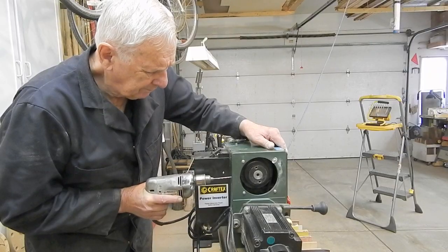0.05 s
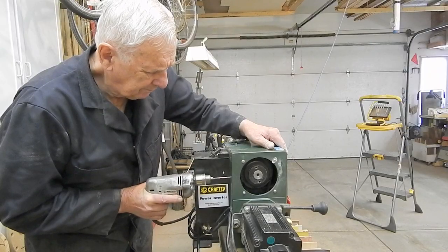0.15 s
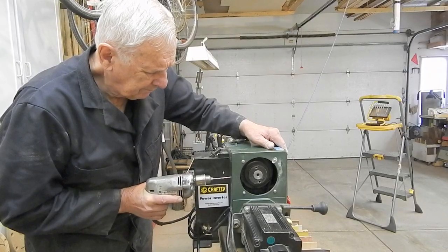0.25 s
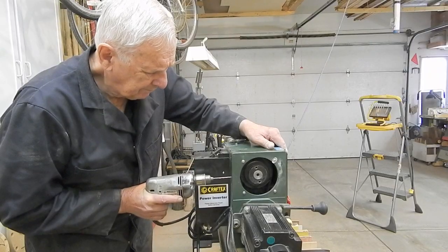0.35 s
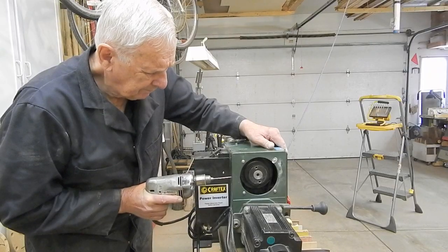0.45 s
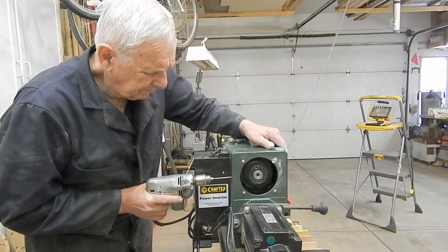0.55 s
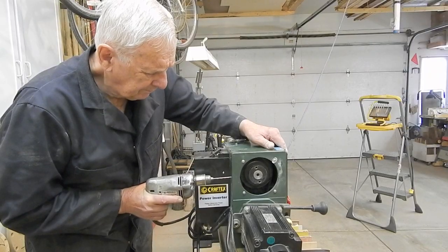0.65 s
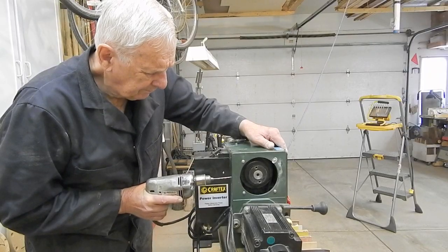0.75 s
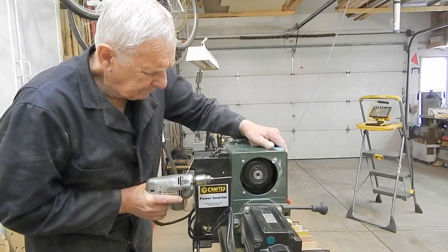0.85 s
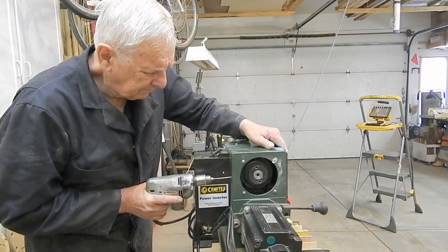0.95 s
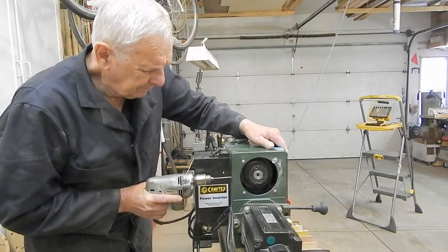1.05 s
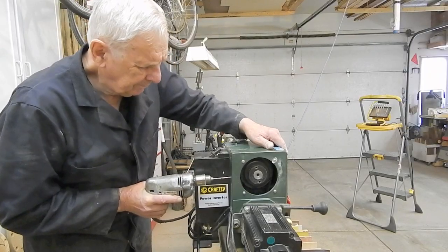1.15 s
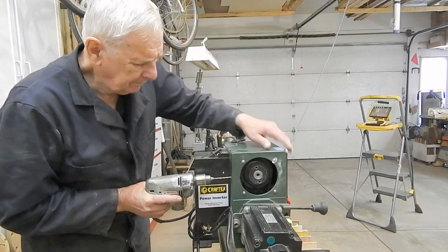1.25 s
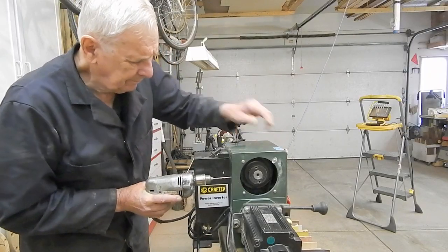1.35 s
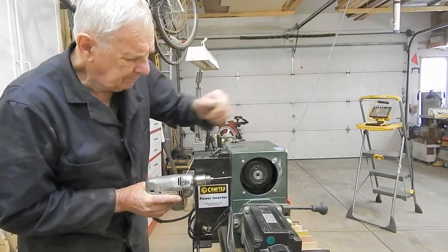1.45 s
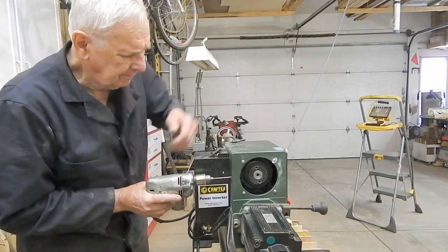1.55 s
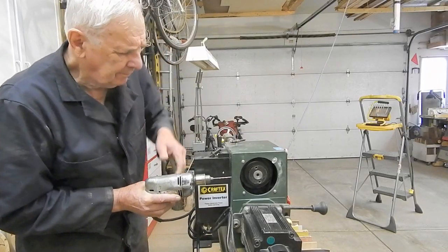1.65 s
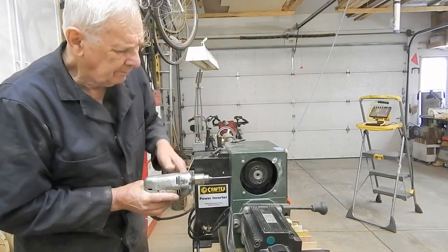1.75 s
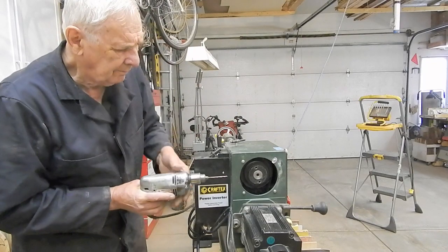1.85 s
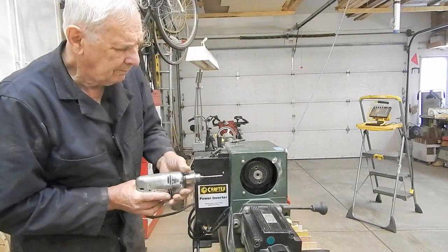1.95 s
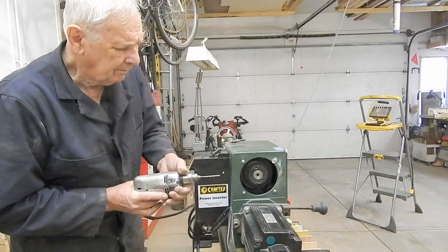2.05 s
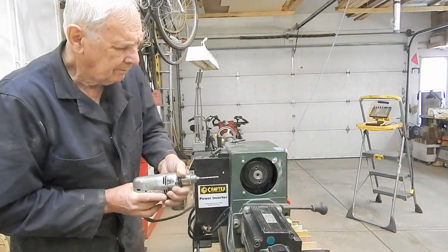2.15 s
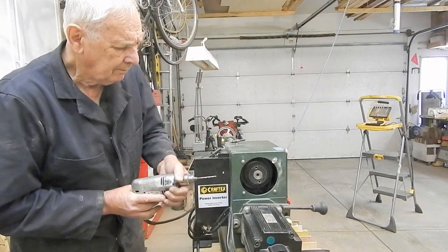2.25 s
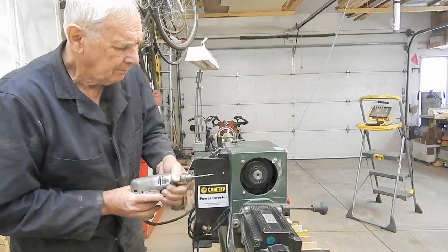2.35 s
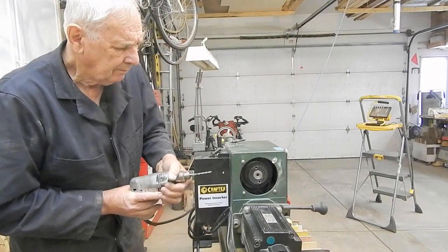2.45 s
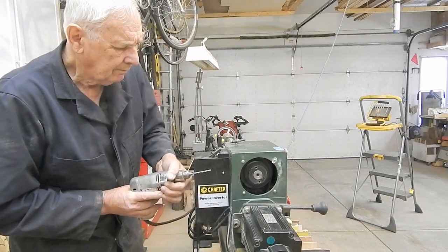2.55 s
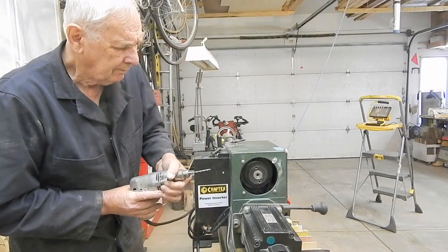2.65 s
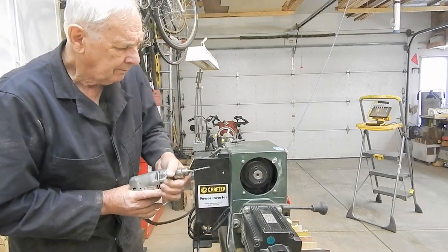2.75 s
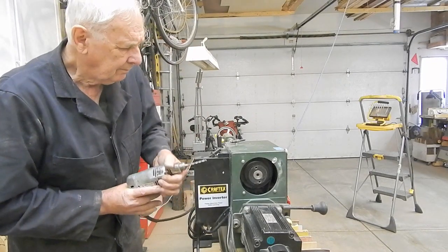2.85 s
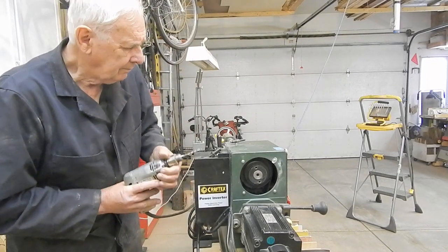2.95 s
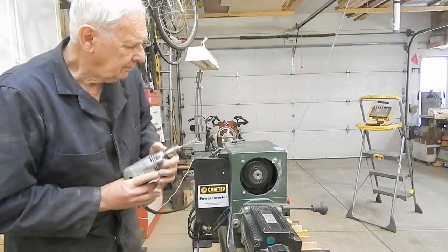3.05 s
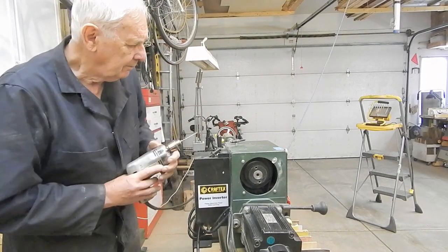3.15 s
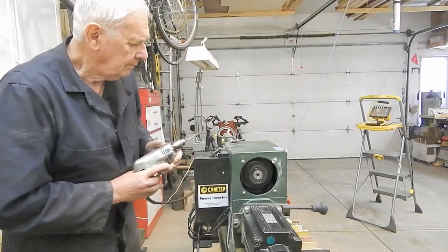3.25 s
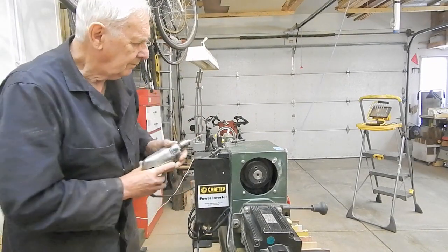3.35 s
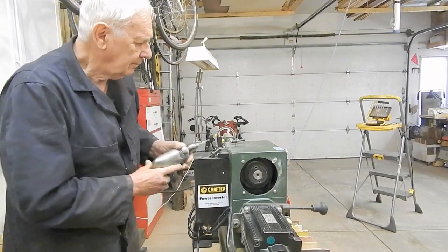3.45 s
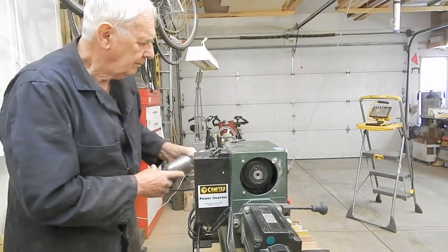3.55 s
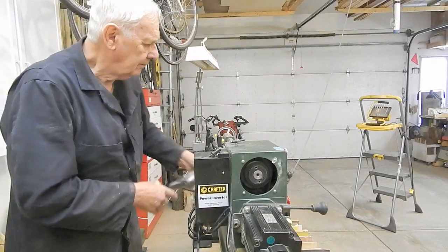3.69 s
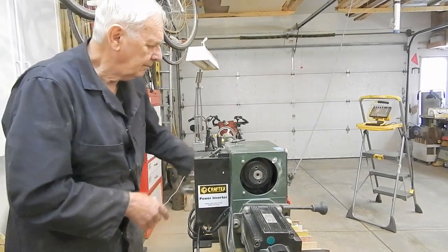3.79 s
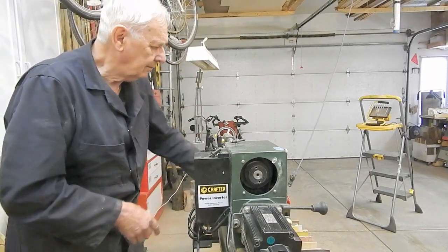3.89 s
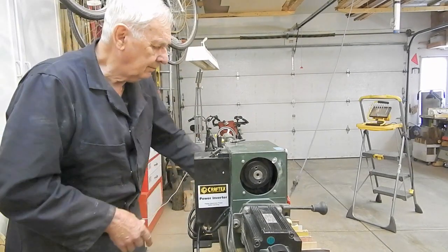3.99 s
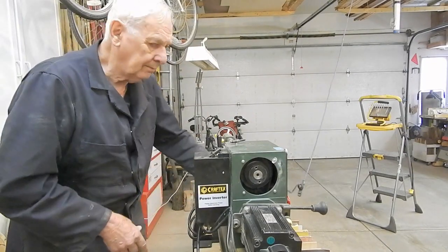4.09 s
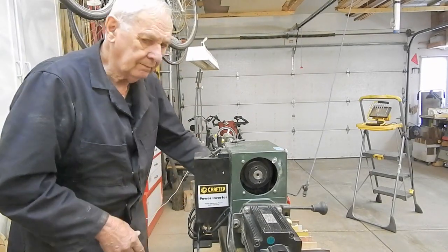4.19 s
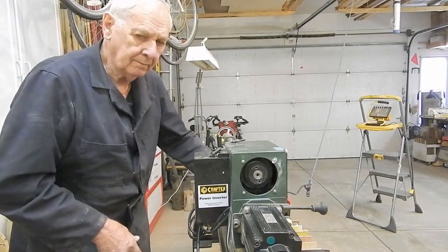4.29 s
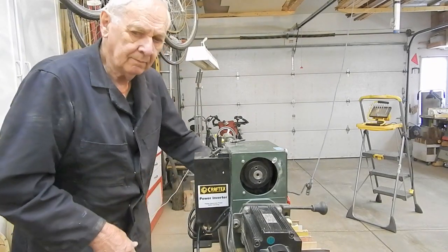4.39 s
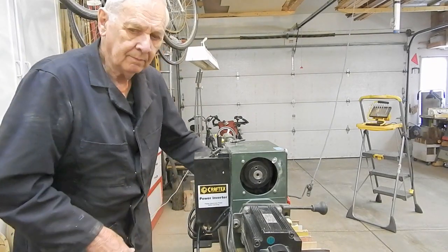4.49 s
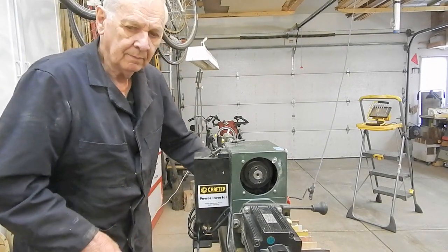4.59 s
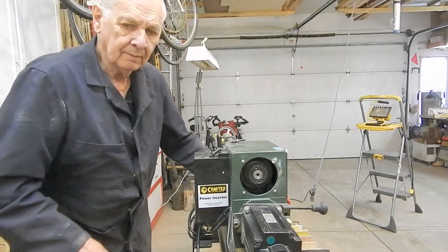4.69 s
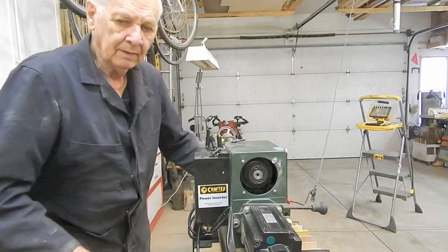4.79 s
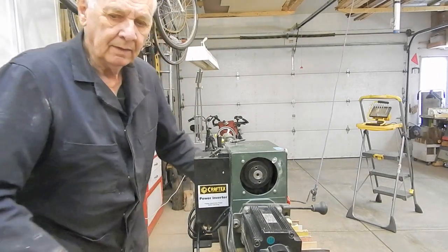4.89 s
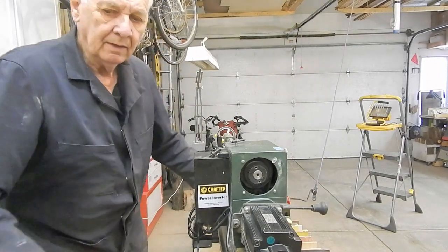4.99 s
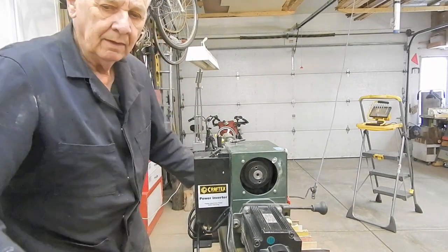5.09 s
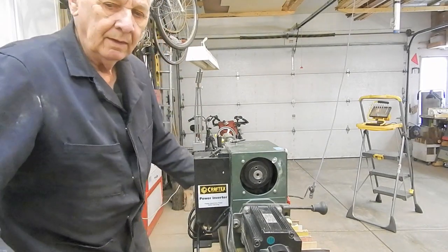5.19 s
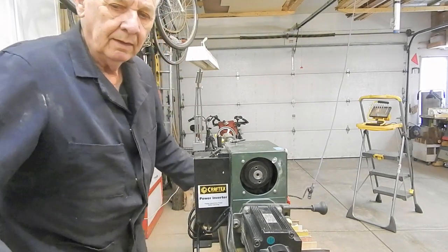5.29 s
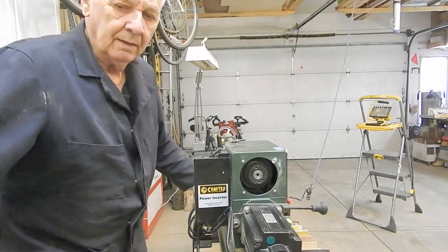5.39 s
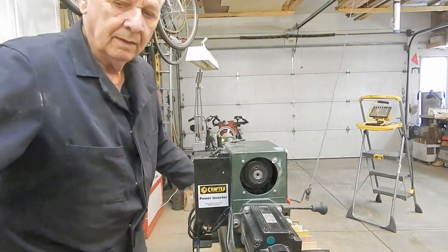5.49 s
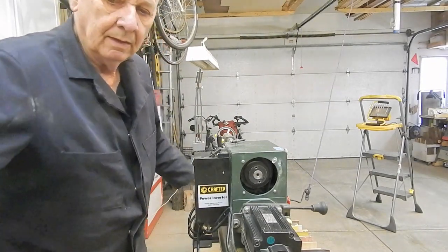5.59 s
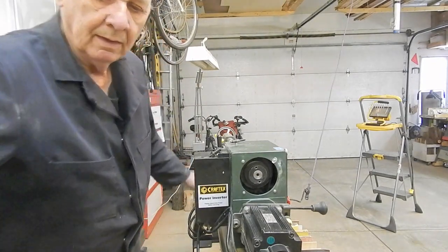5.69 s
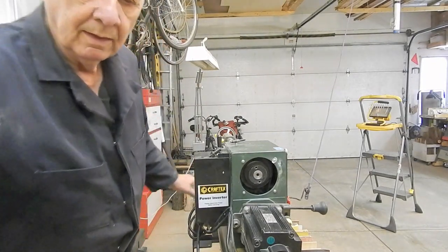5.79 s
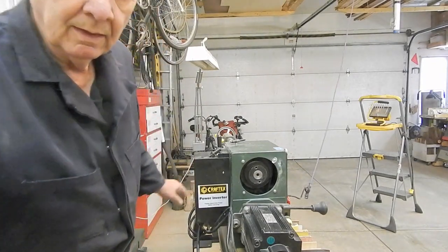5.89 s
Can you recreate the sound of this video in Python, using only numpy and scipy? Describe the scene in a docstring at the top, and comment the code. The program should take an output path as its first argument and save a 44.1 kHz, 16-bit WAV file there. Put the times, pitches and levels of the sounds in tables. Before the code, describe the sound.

Close in a large reverberant garage, a hand drill runs with a bright, gritty whine and thin high squeals. It is switched off, coasts down in pitch, and is braked abruptly by hand with short groans. Small chuck clicks follow, then rattles and a burst of loud knocks on a steel case as the tool is laid down. Lighter taps and scuffs trail off over a faint engine drone.

```python
"""Large garage: a hand drill whines against sheet metal, is switched off and braked by hand.
Then come chuck clicks, scuffs, and knocks as it is laid down and a steel case is knocked.
The drill is shaped noise, shaft orders and narrow squeals; knocks are decaying modes plus noise thuds.
A far engine drones as a few wavering firing orders under rumble and rustling cloth.
Echoes are sparse reflections with a decay time per frequency."""
import sys
import numpy as np
from scipy import signal
from scipy.fft import rfft, irfft, next_fast_len
from scipy.io import wavfile
from scipy.ndimage import uniform_filter1d

SR = 44100
rng = np.random.default_rng(int(sys.argv[2]) if len(sys.argv) > 2 else 0)


def attenuation_scalar(level_db):
    """Turn a level in dB into a linear amplitude multiplier (20 dB per decade)."""
    decades = np.asarray(level_db, float) / 20
    return 10 ** decades


def digitize_waveform(pressure):
    """Quantize a signal to 16-bit integers and store it at the path in sys.argv[1].

    Rows of a 2-D input are taken as channels; values are limited to [-1, 1].
    """
    field = np.atleast_2d(pressure).T
    bounded = np.clip(field, -1, 1)
    quanta = np.round(bounded * 32767).astype(np.int16)
    wavfile.write(sys.argv[1], SR, quanta)


N = 261513  # samples


def evened(x):
    """Scales to rms 1."""
    return x / np.sqrt(np.mean(x ** 2) + 1e-20)


def read(points, hz):
    """Reads a (frequency, value) table, linear in log frequency."""
    f, value = np.transpose(points)
    return np.interp(np.log(hz + 1), np.log(f + 1), value)


def curves(rows):
    """Draws each column against the first, time, over the whole scene."""
    s, *columns = np.transpose(rows)
    return [np.interp(np.arange(N) / SR, s, c) for c in columns]


def ramp(s, seconds):
    """Rises from 0 at time s to 1 some seconds later."""
    return np.clip((np.arange(N) / SR - s) / seconds, 0, 1)


def coloured(x, points):
    """Filters by a (frequency, dB) table without phase shift."""
    size = next_fast_len(x.shape[-1])
    gain = attenuation_scalar(read(points, np.fft.rfftfreq(size, 1 / SR)))
    return irfft(rfft(x, size) * gain, size)[..., :x.shape[-1]]


def wander(seconds):
    """Slow chance of rms 1: noise averaged twice over some seconds."""
    size = round(seconds * SR)
    once = uniform_filter1d(rng.standard_normal(N), size)
    return evened(uniform_filter1d(once, size))


def whistle(hz, width_hz):
    """Noise through a narrow moving resonance, rms 1."""
    r = np.exp(-np.pi * width_hz / SR)
    noise = rng.standard_normal(N) + 1j * rng.standard_normal(N)
    envelope = signal.lfilter([1], [1, -r], noise)
    carrier = np.exp(2j * np.pi * np.cumsum(hz * np.ones(N)) / SR)
    return evened((carrier * envelope).real)


# left-right likeness: (frequency [Hz], share [0-1])
LIKENESS = [(25, 0.96), (60, 0.9), (180, 0.68), (350, 0.99), (700, 0.91), (1650, 0.57), (3000, 0.4),
            (4970, 0.005), (15000, 0.0085)]
# channel balance: (frequency [Hz], left minus right [dB])
BALANCE = [(25, -1.6), (60, -3.5), (240, -3), (950, -1.5), (2000, -0.5), (3770, -2), (8000, -3.5),
           (15000, 1.5)]


def pair(a, b):
    """Two channels: the right hears a share of the left's a and a share of its own b."""
    size = next_fast_len(len(a))
    hz, a_z, b_z = np.fft.rfftfreq(size, 1 / SR), rfft(a, size), rfft(b, size)
    same, lean = np.clip(read(LIKENESS, hz), -1, 1), attenuation_scalar(read(BALANCE, hz) / 2)
    left = a_z * lean
    right = (same * a_z + np.sqrt(1 - same ** 2) * b_z) / lean
    return irfft(np.array([left, right]), size)[:, :len(a)]


# allpass delays that make the two channels less alike: delay [samples]
SCATTER_SAMPLES = [23, 41, 67, 109]


def scattered(x):
    """Allpass chain: same spectrum, phases shuffled over a few milliseconds."""
    for lag in SCATTER_SAMPLES:
        taps = np.zeros(lag + 1)
        taps[[0, lag]] = 1, .6
        x = signal.lfilter(taps[::-1], taps, x)
    return x


# garage reverberation: (frequency [Hz], t60 [s])
GARAGE_T60 = [(100, 1), (400, 0.52), (1000, 0.75), (2500, 0.6), (5000, 0.56), (12000, 0.21)]


def echoes(x):
    """Sparse reflections that build over some milliseconds and die band by band."""
    taps = np.zeros((2, SR))
    at = np.arange(100, SR - 20, 20) + rng.integers(0, 20, (2, (SR - 101) // 20))
    np.put_along_axis(taps, at, rng.choice([-1., 1.], at.shape), 1)
    hz, t, z = signal.stft(taps, SR, nperseg=256)
    decay = attenuation_scalar(-60 * t / read(GARAGE_T60, hz)[:, None]) * np.minimum(t / 0.0015, 1)
    tail = signal.istft(z * decay, SR, nperseg=256)[1][:, :SR]
    response = pair(*tail) / np.linalg.norm(tail[0])
    return signal.fftconvolve(x[None], response, axes=1)[:, :N]


def garage(x, wet_db):
    """Direct sound, phase-shuffled between channels, plus echoes whose paths drift as things move."""
    sway = 2 * np.pi * 1.5 * np.arange(N) / SR  # 1.5 Hz turn between two sets of echoes
    wet = echoes(x * np.cos(sway)) + echoes(x * np.sin(sway))
    direct = pair(x, scattered(x))
    return (direct + attenuation_scalar(wet_db) * wet) / np.sqrt(1 + attenuation_scalar(2 * wet_db))


# relative rattle spectra, driven and coasting: (frequency [Hz], density [dB per Hz])
DRIVEN_SPECTRUM = [(120, -34), (300, -7.5), (1250, -5), (1750, -9.5), (2300, 1), (3000, 2.5), (3500, -8.5),
                   (4100, -8), (4400, -2), (6000, -6), (7000, 2.5), (7600, -3.5), (9500, -0.5),
                   (10500, 9.5), (11400, -3.5), (13500, -2), (14100, -6.5), (15500, -18)]
COASTING_SPECTRUM = [(150, -93), (300, -29), (850, -3.5), (1200, -7), (1700, -5), (2000, 4.5), (2400, 2),
                     (2950, 5.5), (3500, -4), (4100, -7), (5300, -0.5), (6000, -8.5), (7000, -4),
                     (8000, -6.5), (10500, -6.5), (11400, -5), (13500, -4.5), (15500, -73)]
# housing rings, fading with shaft speed: (frequency [Hz], width [Hz], full-speed level [dB])
HOUSING_RINGS = [(2316, 30, -45), (2640, 30, -46.5), (6880, 100, -54), (7106, 100, -53), (10100, 50, -50),
                 (10650, 60, -50)]
# shaft orders: (multiple of shaft rate, driven level [dB], coasting level before the vent [dB])
SHAFT_ORDERS = [(1, -47.5, -56), (2, -57, -65), (4.05, -57, -65), (6, -66, -46), (8, -62, -43),
                (9, -45, -60), (12, -54, -41), (14.5, -66, -47), (16, -60, -38), (22, -66, -46)]
# what the case lets out of the coasting orders: (frequency [Hz], gain [dB])
VENT_GAIN = [(1000, -16), (1800, -6), (2000, 0), (3000, 0), (3300, -12), (6000, -28)]
# gear-case squeals: (driven frequency [Hz], slow frequency [Hz])
SQUEAL_PITCHES = [(10250, 10380), (10920, 10750)]
# same squeals: (driven level [dB], slow level [dB], level under the hand [dB])
SQUEAL_LEVELS = [(-29.5, -27.5, -41.5), (-32.5, -38.5, -49)]
# short narrow groans of the coasting and braking drill:
#   (start [s], length [s], level [dB], first [Hz], last [Hz])
RUNDOWN_GROANS = [(1.766, 0.26, -43, 1186, 1135), (2.23, 0.14, -35, 2960, 2900),
                  (2.419, 0.22, -41.5, 830, 880), (2.6, .2, -43.5, 900, 900)]
FULL_HZ, OFF_S, DRAG_S = 325.6, 1.15, 2.2  # shaft rate, trigger let go, coasting time constant
GRIP_S, BRAKE_HZ_PER_S = 2.38, 347  # hand closes on the chuck
STOP_S, STOP_DB_PER_S = 2.595, 145  # final die-away
RATTLE_DB = -29  # driven, before the two changes below
PRE_OFF_DB = -1.5  # small change shortly before the trigger is let go
PRE_GRIP_DB = 1  # rise of the rattle and orders just before the hand closes
EASE_S, EASE_DB = 0.98, -3  # shaft hum weakens as the bit stops being pushed
HUM_WAVER_DB, LINE_WAVER_DB = 1.2, 3  # first order; upper orders
SETTLED_SHARE = .36  # speed share lost when the squeals have settled
FLARE_S, FLARE_DB = 0.16, 7  # squeals flare just before the hand damps them
SQUEAL_WIDTH_HZ, GROAN_WIDTH_HZ = 38, 70
GROAN_RISE_SHARE = 0.32


def drill():
    """Gear rattle beats with each turn; orders fall with the shaft; case squeals draw together."""
    t = np.arange(N) / SR
    coasted_s = np.clip(t - OFF_S, 0, GRIP_S - OFF_S)
    braked_hz = BRAKE_HZ_PER_S * np.maximum(t - GRIP_S, 0)
    speed_hz = np.maximum(FULL_HZ * np.exp(-coasted_s / DRAG_S) - braked_hz, 0)
    lost = 1 - speed_hz / FULL_HZ
    coast = np.clip(1.35 * lost, 0, 1)
    slow = np.minimum(lost / SETTLED_SHARE, 1) ** 2
    power = (speed_hz / FULL_HZ) ** 8  # magnetic pull ends with the current
    held, flare = ramp(GRIP_S - .03, 0.011), ramp(GRIP_S - FLARE_S, FLARE_S)
    dying = attenuation_scalar(-STOP_DB_PER_S * np.maximum(t - STOP_S, 0))
    effort = attenuation_scalar(PRE_OFF_DB * ramp(OFF_S - .3, 0.19) + PRE_GRIP_DB * flare) * dying
    turns = np.cumsum(speed_hz * (1 + 0.001 * wander(0.02))) / SR

    grain = attenuation_scalar(2.0 * wander(0.00058) + 1.53 * wander(0.014))
    teeth = rng.standard_normal(N) * grain * (1 + 0.065 * np.cos(2 * np.pi * turns))

    def unit_rattle(points):
        """Coloured teeth noise, rms 1 within about 1.5-9 kHz."""
        rattle = coloured(teeth, points)
        return rattle / np.std(coloured(rattle, [(1400, -60), (1500, 0), (9000, 0), (9400, -60)]))

    mixed = (1 - coast) * unit_rattle(DRIVEN_SPECTRUM) + coast * unit_rattle(COASTING_SPECTRUM)
    rattle = attenuation_scalar(RATTLE_DB) * effort * mixed

    orders = np.zeros(N)
    for k, driven_db, coast_db in SHAFT_ORDERS:
        vented_db = coast_db + read(VENT_GAIN, k * speed_hz)
        line_db = power * driven_db + (1 - power) * vented_db
        line_db += (HUM_WAVER_DB if k == 1 else LINE_WAVER_DB) * wander(0.017)
        if k == 1:
            line_db += EASE_DB * ramp(EASE_S, 0.069)
        orders += np.sqrt(2) * effort * attenuation_scalar(line_db) * np.cos(2 * np.pi * k * turns)
    for hz, width_hz, db in HOUSING_RINGS:
        orders += effort * power * attenuation_scalar(db) * whistle(hz, width_hz)

    for (hz, slow_hz), (db, slow_db, held_db) in zip(SQUEAL_PITCHES, SQUEAL_LEVELS):
        free_db = db + (slow_db - db) * slow + FLARE_DB * flare
        level = attenuation_scalar(free_db + (held_db - free_db) * held)
        pitch_hz = hz + (slow_hz - hz) * slow + 40 * slow * wander(0.0087)
        rattle += dying * level * whistle(pitch_hz, SQUEAL_WIDTH_HZ)

    for s, length_s, db, hz, last_hz in RUNDOWN_GROANS:
        rise_s = GROAN_RISE_SHARE * length_s
        shape = ramp(s, rise_s) * (1 - ramp(s + rise_s, length_s - rise_s))
        pitch_hz = hz + (last_hz - hz) * ramp(s, length_s) + 25 * wander(0.0303)
        rattle += attenuation_scalar(db) * shape * whistle(pitch_hz, GROAN_WIDTH_HZ)
    return rattle, orders


# far engine: (time [s], firing rate [Hz], firing level [dB],
#   base level of all upper orders but the even ones [dB], base level of the even ones [dB])
ENGINE = [(0, 89.1, -70.5, -60, -92), (1.3, 92.74, -61, -53.5, -67), (2, 93.6, -63, -50.5, -62.5),
          (2.6, 95.5, -60, -57, -62.5), (3.1, 97.06, -45, -54.5, -54), (3.6, 96.8, -47.5, -60.5, -59.5),
          (4.6, 96.84, -51, -53.5, -58), (5.1, 96.3, -59, -55, -60.5), (5.93, 96.2, -58, -63.5, -73)]
# upper orders: (multiple of firing rate, level over base [dB])
ENGINE_ORDERS = [(2, -1), (2.5, -11), (3, 0), (4, -1), (4.5, -12), (6.17, -8)]


def drone():
    """Firing orders of a far engine, wavering with the air."""
    hz, db, odd_db, even_db = curves(ENGINE)
    turns = np.cumsum(hz * (1 + 0.005 * wander(0.033))) / SR
    out = attenuation_scalar(db + wander(0.078)) * np.cos(2 * np.pi * turns)
    for k, order_db in ENGINE_ORDERS:
        level = attenuation_scalar(order_db + (odd_db if k % 2 else even_db) + 2.2 * wander(.1))
        out += level * np.cos(2 * np.pi * (k * turns + rng.random()))
    return np.sqrt(2) * out


# relative rumble spectrum: (frequency [Hz], density [dB per Hz])
RUMBLE_SPECTRUM = [(12, -34), (30, 4), (52, 4), (80, 0.5), (207, -2), (306, -5), (440, -10), (600, -8.5),
                   (810, -9.5), (1200, -13.5), (3540, -24.5), (8000, -27.5), (11000, -23.5), (15500, -36)]
# rumble below about 70 Hz: (time [s], level [dB])
RUMBLE_LEVEL = [(0, -68), (1.6, -65), (2.8, -59.5), (3.25, -53.5), (5.93, -53.5)]
# sleeve moves: (middle [s], level [dB], half length [s])
SLEEVE_MOVES = [(3.115, -57, 0.079), (3.402, -61, .03), (3.51, -53, 0.033), (3.6, -62, .03),
                (3.762, -51, .05), (4.114, -34, 0.021)]
# relative cloth spectrum: (frequency [Hz], density [dB per Hz])
CLOTH_SPECTRUM = [(3000, -30), (8000, -12), (9500, 0), (13000, 0), (15500, -8)]


def room_tone():
    """Rumble and hiss from shaped noise, and cloth rustling in patches."""
    a, b, c, d = rng.standard_normal((4, N))
    rumble = coloured(pair(a, b), RUMBLE_SPECTRUM) * attenuation_scalar(1. * wander(0.033))
    rumble /= np.std(coloured(rumble, [(70, 0), (80, -60)]))
    t = np.arange(N) / SR
    moving = sum(attenuation_scalar(db) * np.exp(-((t - s) / half_s) ** 2) for s, db, half_s in SLEEVE_MOVES)
    crackle = attenuation_scalar(2. * wander(0.0027))
    cloth = evened(coloured(pair(c, d) * crackle, CLOTH_SPECTRUM)) * moving
    return attenuation_scalar(curves(RUMBLE_LEVEL)[0]) * rumble + cloth


# chuck clicks: (time [s], peak level [dB], lower ring [Hz], upper ring [Hz])
CHUCK_CLICKS = [(2.994, -39, 1200, 2160), (3.129, -38.5, 1150, 2540), (3.25, -35.5, 1060, 2160)]


def ticks():
    """A hundredth of a second of chatter excites a low ring and a pair of higher ones."""
    out, t = np.zeros(N), np.arange(1500) / SR
    for s, db, low_hz, high_hz in CHUCK_CLICKS:
        chatter = rng.standard_normal(len(t)) * np.exp(-(t / .008) ** 4) * np.minimum(t / .002, 1)
        rings = np.sin(2 * np.pi * low_hz * t) + 0.99 * np.sin(2 * np.pi * high_hz * t)
        rings += 0.53 * np.sin(2 * np.pi * 1.21 * high_hz * t)
        tick = signal.fftconvolve(chatter, rings * t * np.exp(-t / 0.00084))[:len(t)]
        out[round(s * SR):][:len(t)] += attenuation_scalar(db) * tick / abs(tick).max()
    return out


# shoes, hands and the tool slide: (time [s], level before the envelope [dB], length [s], treble tilt [dB])
SLIDES = [(3.291, -54, 0.18, -57), (3.68, -44, .04, -11), (4.005, -29, 0.14, -9), (4.068, -27, 0.03, -23),
          (4.148, -34, 0.093, -12), (4.467, -35.5, 0.075, -10), (4.822, -45.5, 0.0078, 14),
          (5.054, -47.5, 0.049, -8), (5.192, -39, 0.031, 3), (5.4, -47, 0.042, 3), (5.585, -41, 0.048, -6)]


def scuffs():
    """Sliding contact: a gritty hiss that rises over about half its length and thins out."""
    grit = np.pad(wander(0.003), (0, SR))
    out, t = np.zeros(N + SR), np.arange(SR // 2) / SR
    for s, db, length_s, treble_db in SLIDES:
        start = round(s * SR)
        colour = [(300, -20), (1000, -2), (1500, 0), (5000, treble_db / 2 - 3),
                  (11000, treble_db - 5), (15000, treble_db - 12)]
        hiss = evened(coloured(rng.standard_normal(len(t)), colour))
        shape = np.minimum(t / (0.57 * length_s), 1) * np.exp(-(t / length_s) ** 2)
        out[start:][:len(t)] += attenuation_scalar(db + 0.63 * grit[start:][:len(t)]) * hiss * shape
    return out[:N]


SPOT_SPREAD_DB = 2  # each blow wakes the modes in its own proportions


def ring(modes, t):
    """Sum of decaying modes in chance phases, rms 1."""
    chance_db, phase = SPOT_SPREAD_DB * rng.standard_normal(len(modes)), rng.random(len(modes))
    total = np.zeros(len(t))
    for (hz, db, t60), more_db, p in zip(modes, chance_db, phase):
        total += attenuation_scalar(db + more_db - 60 * t / t60) * np.sin(2 * np.pi * (hz * t + p))
    return evened(total)


# blows: (time [s], middle-band peak [dB], boom over middle [dB], treble over middle [dB],
#   favoured boom [Hz], favoured middle [Hz], favoured treble [Hz], rise of middle and treble [s])
BLOWS = [(3.677, -34, -21, -5, 500, 2110, 4300, 0.0029), (3.684, -29.5, -11, -13, 650, 1050, 4300, .0015),
         (3.692, -32, -28, -16, 500, 1570, 4300, 0.0017), (3.748, -36.5, -35, -1, 500, 2750, 4330, .002),
         (3.753, -34, -30, -12, 500, 1900, 4300, 0.0016), (3.779, -46, -28, -12, 500, 1500, 4300, .001),
         (4.003, -19.5, -26, 2, 500, 2860, 5900, .003), (4.011, -18, -27, -4, 500, 2270, 5900, 0.0014),
         (4.021, -19.5, -16, -8, 603, 1060, 5900, .002), (4.065, -14, -11, -4, 600, 930, 5020, 0.0017),
         (4.098, -19, -6, -8, 250, 1140, 4800, 0.0018), (4.139, -12, 2.5, -7, 410, 2830, 4200, 0.0026),
         (4.459, -8, -2.5, -20.5, 510, 1130, 4720, 0.0043),
         (4.466, -16.5, -7, -19, 520, 2290, 4700, 0.0034), (4.484, -16, 4, -15, 600, 1210, 4680, 0.0029),
         (4.708, -29, 2, -9.5, 493, 2040, 4500, 0.0016), (4.721, -28, -3.5, -23, 600, 1170, 4500, 0.0025),
         (4.812, -40, -18, -27, 600, 1180, 4500, 0.0015), (4.861, -35.5, -36, -8, 500, 3400, 4500, 0.0015),
         (4.865, -40, -15, -20, 600, 1300, 4464, .002), (4.938, -32, -1, -17, 560, 1080, 4500, 0.004),
         (4.944, -38.5, -3, -15, 600, 2100, 4500, .002), (5.082, -44.5, 5, -12, 605, 2230, 4500, .002),
         (5.191, -38, -1, -5, 200, 1980, 5030, .0006), (5.246, -38.5, -1, -1, 650, 1260, 4500, 0.0031)]
# relative modes of steel case and drill body: (frequency [Hz], level [dB], t60 [s])
CASE_MODES = [(165, -15, .2), (230, -15, .15), (421, -5, .2), (447, -2, .22), (480, -6, .15),
              (511, -4, .16), (547, -5, .14), (582, -6, .14), (620, -4, .17), (660, -4, .15),
              (716, -4, .14), (910, -8, .1), (1082, -5, .13), (1135, -4, .13), (1270, -4, .13),
              (1420, -6, .12)]
BODY_MODES = [(1007, 4, 0.072), (1180, 16.5, 0.034), (1575, 2, 0.05), (1953, 6.5, 0.046), (2260, 12, 0.046),
              (2906, -2, 0.062), (3340, -15, 0.033), (5050, -12, 0.048), (5900, -7.5, 0.057)]
# relative spectrum of the bare contact: (frequency [Hz], density [dB per Hz])
THUD_SPECTRUM = [(100, -16), (200, -6), (330, -10.5), (430, -3), (720, -2.5), (830, -3.5), (1000, -5.5),
                 (1400, -5.5), (1600, -8.5), (3300, -9), (3700, -19.5), (11000, -15), (15000, -58)]
CONTACT_CYCLES = 19.9  # contact time constant in cycles of the favoured middle: duller grinds longer
CRACK_S, CRACK_DB = 0.0021, 5  # first instant of a blow
BOOM_RISE_S = 0.01  # low ring builds more slowly
SPOT_FLOOR, SPOT_WIDTH = .3, .22  # share added at every pitch; favoured width [log Hz]


def knocks():
    """A push rings case and drill; the rough contact thuds; each struck spot favours its own range."""
    out, t = np.zeros(N + SR), np.arange(SR // 2) / SR
    hz = np.fft.rfftfreq(SR, 1 / SR)
    low, high = 1 / (1 + (hz / 800) ** 6), 1 / (1 + (3500 / (hz + 1)) ** 6)

    def favoured(centre_hz, width):
        """Bell in log frequency over a constant floor."""
        return SPOT_FLOOR + np.exp(-(np.log((hz + 1) / centre_hz) / width) ** 2)

    for s, db, boom_db, treble_db, boom_hz, spot_hz, top_hz, rise_s in BLOWS:
        grind = np.exp(-t * spot_hz / CONTACT_CYCLES) + attenuation_scalar(CRACK_DB) * np.exp(-t / CRACK_S)
        thud = coloured(rng.standard_normal(len(t)), THUD_SPECTRUM) * grind * np.minimum(t / 0.004, 1)
        rings = (ring(CASE_MODES, t) + 0.4 * ring(BODY_MODES, t)) * np.minimum(t / 0.0022, 1)
        hit = rfft(evened(thud) + 0.59 * rings, SR)
        bands = [
            (low * favoured(boom_hz, 2 * SPOT_WIDTH), boom_db, BOOM_RISE_S),
            ((1 - low - high) * favoured(spot_hz, SPOT_WIDTH), 0, rise_s),
            (high * favoured(top_hz, SPOT_WIDTH / 3), treble_db, rise_s),
        ]
        for share, band_db, band_rise_s in bands:
            band = irfft(hit * share, SR)[:len(t)] * np.minimum(t / band_rise_s, 1)
            out[round(s * SR):][:len(t)] += attenuation_scalar(db + band_db) * band / abs(band).max()
    return out[:N]


# drill swinging about in the hand: (time [s], left minus right [dB])
DRILL_AIM = [(0, -0.5), (1.2, -2), (1.6, -1), (2.2, -2), (2.8, 0)]


def scene():
    """Sums the sources, each with its own share of echoes [dB re direct]."""
    rattle, orders = drill()
    aim = attenuation_scalar(np.outer([.5, -.5], curves(DRILL_AIM)[0]))
    near = aim * (garage(rattle, -2.0) + garage(orders + ticks(), -16))
    far = pair(drone(), np.zeros(N)) + room_tone()
    return near + far + garage(scuffs(), -1.5) + garage(knocks(), 1)


def low_pass(x):
    """Removes everything above the highest recorded frequency."""
    return signal.sosfilt(signal.butter(12, 15640, fs=SR, output="sos"), x)


def record(dry):
    """Hands on the finished mix."""
    return low_pass(dry)


dry = scene()
out = record(dry)
digitize_waveform(out)
```